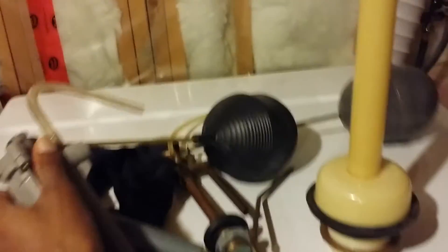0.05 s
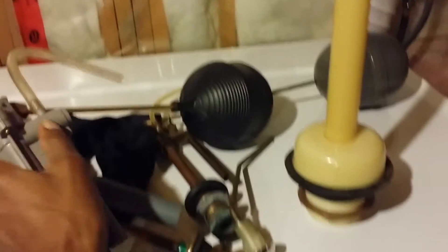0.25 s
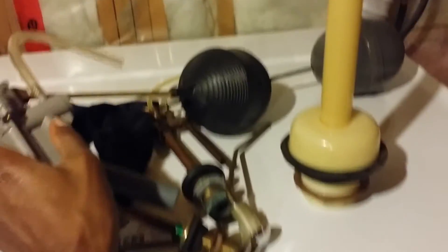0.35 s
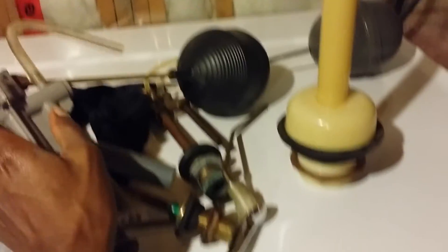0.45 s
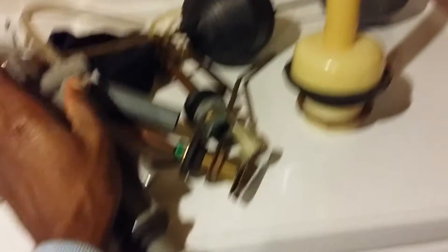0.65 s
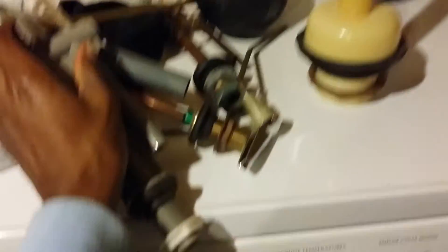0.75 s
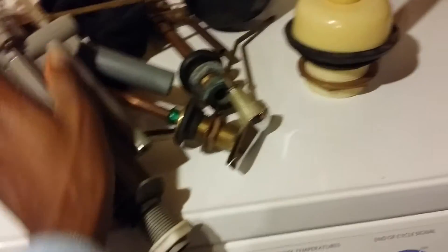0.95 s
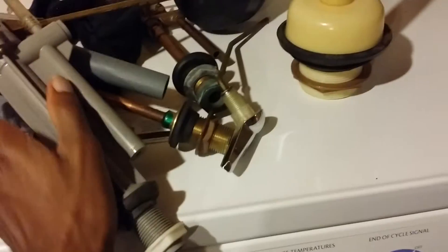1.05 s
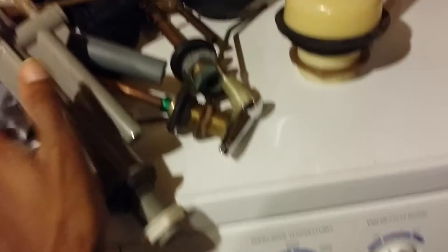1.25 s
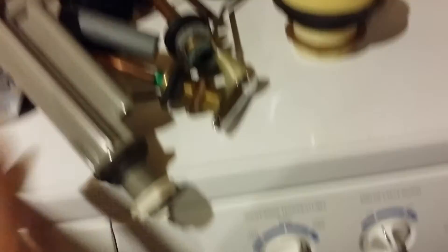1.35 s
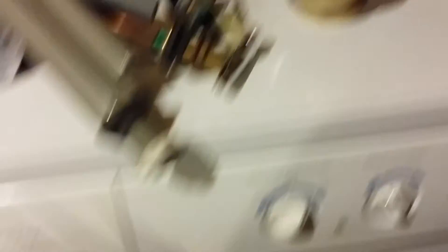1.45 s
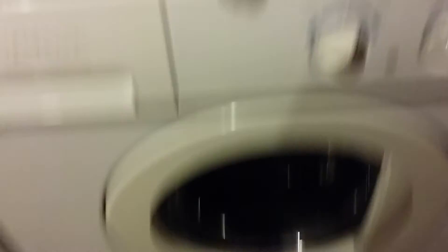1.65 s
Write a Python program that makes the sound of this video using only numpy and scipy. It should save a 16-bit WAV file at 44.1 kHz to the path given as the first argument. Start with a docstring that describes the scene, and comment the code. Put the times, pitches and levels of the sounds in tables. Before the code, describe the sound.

Close up in a small room, plumbing parts clatter twice against a sheet-steel appliance top, thudding, clacking and scraping as they shift. A small fitting clicks, then the handling fades to a soft swish and rustle.

```python
"""Plastic and metal toilet valves clatter in two bunches on a washing machine's sheet-steel top. Each knock
thuds the panel, clacks in the hollow parts and ticks at the contact; a small room rings. Sliding parts scrape
and rumble the panel, a small fitting clicks, brass rods ring on. Light touches, a soft swish and a faint tone
follow. A handling rustle swells at the end with a stick-slip squeak, over still air."""
import sys
import numpy as np
from scipy import signal
from scipy.fft import rfft, irfft
from scipy.io import wavfile
from scipy.ndimage import uniform_filter1d

SR = 44100
rng = np.random.default_rng(int(sys.argv[2]) if len(sys.argv) > 2 else 0)


def pcm_store(signal):
    """Save signal as 16-bit PCM."""
    levels = np.round(np.clip(np.atleast_2d(signal), -1, 1) * 32767)
    wavfile.write(sys.argv[1], SR, levels.astype(np.int16).T)


N = 74970
T = np.arange(N) / SR
CUTOFF_HZ, PANEL_PAN_DB = 15200, -2.5

# knocks: (time [s], thud [dB], thud centre [Hz], clack [dB], clack low-pass [Hz], tick [dB],
# clack left-right [dB])
KNOCKS = [ (0.034, -44, 245.4, -53.5, 3040, -31, 5), (0.2417, -16.5, 300, -18.5, 5040, -26.5, -7),
          (0.246, -21.5, 250, -17, 3970, -26.5, -4.5), (0.2622, -20, 220, -20.5, 4900, -33, -7),
          (0.2703, -27, 220, -18.5, 4040, -35.5, -9), (.2875, -24, 230, -22, 5000, -38, -9.5),
          (0.341, -39, 250, -23, 2230, -31.5, -7), (.3450, -25, 250, -20, 2500, -38, -10),
          (.3530, -27, 200.7, -32.5, 4000, -38.5, -18), (0.5155, -20.5, 350, -26, 1900, -41.5, -3.5),
          (0.5233, -31.5, 355.5, -20, 1650, -37.5, -9.5), (0.5545, -39.5, 302.6, -16, 5830, -23, -4.5),
          (0.568, -19.5, 170, -22.5, 4920, -25, -7), (0.582, -18.5, 170, -15.5, 3000, -23.5, -8.5),
          (0.588, -29, 195.2, -15.5, 5940, -27.5, -12.5), (0.5989, -14, 137, -22.5, 5000, -25, -9.5),
          (0.61, -27.5, 132.2, -23, 4500, -30.5, 1), (0.6204, -23, 125.3, -19, 2500, -32.5, -24),
          (0.717, -40.5, 141.5, -38, 4070, -47.5, -10), (1.03, -76.5, 150, -62, 8000, -54, -5),
          (1.065, -59, 150, -64.5, 6000, -58.5, -20)]
# steel top: (frequency [Hz], level at first spot [dB], level at second spot [dB], t60 [s])
PANEL_MODES = [(99.3, -19, -20.5, .45), (146.6, -12.5, -6, 0.63), (164.6, -11, -8, 0.24),
               (206.7, -1, -15, 0.33), (247.3, -5.5, -12, 0.14), (315, -1.5, -3.5, 0.51),
               (329, -8, -2, 0.39), (355.2, -2.5, -5.5, .14), (457.6, -5, -5.5, 0.17),
               (491.5, -15.5, -8, .28)]
# hollow parts, small stiff fitting: (frequency [Hz], level [dB], t60 [s])
PART_MODES = [(743, -17, 0.23), (864, -12, 0.19), (948, -9.5, 0.18), (1305, -15.5, 0.084),
              (1513, -12, 0.079), (1543, -5, 0.063), (1670, -12, 0.028), (1783, -13.5, 0.13),
              (2370, -14.5, 0.09), (2540, -9.5, 0.07), (3370, -18, 0.081), (3960, -15.5, .09)]
FITTING_MODES = [(650, -12, 0.05), (925, -4, 0.12), (1360, -6.5, 0.038), (1456, -8.5, 0.09),
                 (1740, -1, 0.053), (2270, -2, 0.061), (2780, -11, 0.039), (2980, -8.5, 0.035),
                 (3680, -9, 0.026)]
# dense ringing between the modes, contact tick: (frequency [Hz], relative density [dB])
PANEL_WASH = [(25, -30), (60, -10), (90, -12.5), (140, -0.5), (340, -4.5), (470, -9), (700, -8.5),
              (1500, -49)]
PART_WASH = [(200, -28), (600, -8.5), (900, 1.5), (1200, -3.5), (1600, 2), (2500, -3.5), (4100, -8),
             (5500, -14.5), (14000, -25)]
TICK_SPECTRUM = [(1000, -21), (3000, -11), (6300, -0.5), (7800, 4), (9500, -1), (12000, -4.5), (15000, -16)]
# square blows: (time [s], frequency [Hz], level [dB], t60 [s], left-right [dB])
POCKS = [(0.242, 337, -18.5, 0.13, -1.5), (0.2481, 1717, -18, 0.026, -5), (.3450, 988, -22, 0.055, -7),
         (0.5231, 1585, -17, 0.036, -14), (0.5559, 3854, -11, 0.013, -1), (0.5576, 1594, -2.5, 0.021, -15),
         (.5830, 917, -13, 0.022, -5.5), (0.5890, 2432, -11.5, 0.021, -11),
         (.7915, 711, -43.5, 0.063, -4.5)]
# taps on the fitting: (time [s], level [dB], pitch [ratio], t60 [ratio])
TAPS = [(0.1747, -27, 1, 1), (.7890, -34, 1.142, 0.34)]
# brass rods: (time [s], frequency [Hz], level [dB], t60 [s])
RODS = [(0, 1940, -37.5, .27), (.556, 587, -56, 1.5), (0.558, 890, -64, 2.8), (.556, 1430, -54, 1.1)]
# envelopes of sliding parts, panel under them, swish, handling rustle, thin tone: (time [s], level [dB])
SCRAPE_LEVEL = [(.04, -41), (.08, -47), (.125, -57), (.17, -48), (.21, -46.5), (.24, -37.5), (.30, -40),
                (.40, -71), (.45, -53), (.505, -42.5), (.56, -69.5), (.70, -67.5), (.80, -60), (.88, -77.5),
                (.99, -68.5), (1.04, -62.5), (1.12, -84)]
RUMBLE_LEVEL = [(0, -43.5), (.14, -57.5), (.205, -43), (.3, -36), (.42, -43), (.49, -44.5), (.7, -41),
                (.83, -57.5), (.9, -63), (1.25, -79)]
SWISH_LEVEL = [(.8, -69.5), (1.07, -61), (1.2, -71), (1.3, -87.5)]
RUSTLE_LEVEL = [(1.4, -86), (1.46, -70), (1.54, -61), (1.7, -57)]
TONE_LEVEL = [(1.1, -100), (1.2, -76.5), (1.29, -72.5), (1.33, -83), (1.38, -72), (1.5, -97)]
# noise spectra: (frequency [Hz], relative density [dB])
SCRAPE_SPECTRUM = [(400, -8), (900, 6), (2600, 5), (4200, -0.5), (6000, -1.5), (7900, 2), (9500, -2.5),
                   (14500, -7)]
SWISH_SPECTRUM = [(200, -1.5), (560, -3), (720, -11.5), (900, -2), (1450, -1), (3000, -19.5), (8000, -32.5)]
RUSTLE_SPECTRUM = [(40, -24), (150, -3), (290, 4), (480, -4), (750, -16.5), (1050, -3), (1400, -11.5),
                   (2100, -10.5), (3200, -18), (5000, -26.5), (14000, -32)]
AIR_SPECTRUM = [(40, -2.5), (130, -2), (300, -9.5), (600, -16.5), (950, -6.5), (2200, -19), (14500, -22)]
# valve sliding clear: (time [s], frequency [Hz], level [dB])
SQUEAK_GLIDE = [(1.57, 7600, -89.5), (1.615, 8150, -82.5), (1.635, 8470, -69), (1.655, 8600, -80),
                (1.7, 10600, -76)]
# room tail: (frequency [Hz], t60 [s], level [dB])
ROOM_BANDS = [(120, 0.62, -13), (390, 0.31, -10), (900, 0.5, -8.5), (3000, 0.24, -9), (8000, 0.39, -8.5),
              (14000, 0.17, -16)]
# stereo field: (frequency [Hz], left-right correlation [ratio])
COHERENCE = [(60, 0.91), (250, 0.94), (500, .8), (1000, 0.47), (3000, 0.087), (12000, 0.47)]


def from_db(db):
    """Decibels to gain."""
    return 10 ** (np.asarray(db) / 20)


def unit_rms(x):
    """Scale to rms 1."""
    return x / np.sqrt(np.mean(x ** 2) + 1e-20)


def envelope(rows):
    """Gain from (time [s], level [dB]) rows."""
    return from_db(np.interp(T, *np.transpose(rows)))


def at_hz(rows, hz, column=1):
    """Interpolate a column over log frequency."""
    rows = np.array(rows)
    return np.interp(np.log(hz + 1), np.log(rows[:, 0]), rows[:, column])


def pan(db):
    """Constant-power gains; positive is left."""
    return unit_rms(from_db(np.array([[db / 2], [-db / 2]])))


def decay(t, t60_s):
    """Exponential decay, silent before t = 0."""
    return (t >= 0) * np.exp(-np.log(1000) * np.maximum(t, 0) / max(t60_s, .001))


def attack(t, rise_s):
    """Exponential rise from t = 0."""
    return 1 - np.exp(-np.maximum(t, 0) / rise_s)


def noise(spectrum, source=None):
    """Shape white noise or a mid/side source: narrow bass, wide treble, rms 1."""
    mid, side = rfft(rng.standard_normal((2, N)) if source is None else source)
    hz = np.arange(len(mid)) * SR / N
    coherence = np.clip(at_hz(COHERENCE, hz), -1, 1)
    stereo = np.sqrt(1 + coherence) * mid + np.sqrt(1 - coherence) * side * np.array([[1], [-1]])
    return unit_rms(irfft(stereo * from_db(at_hz(spectrum, hz)), N))


def ring(modes, t, vary_db, width_rad):
    """Damped modes of alternating sign, phase-offset between channels, cut at 0.5 s."""
    out, live = np.zeros((2, N)), (t >= 0) & (t < .5)
    for k, (hz, db, t60_s) in enumerate(modes):
        phase = width_rad * rng.standard_normal() * np.array([[1], [-1]])
        gain = (-1) ** k * from_db(db + vary_db * rng.standard_normal())
        out[:, live] += gain * decay(t[live], t60_s) * np.sin(2 * np.pi * hz * t[live] + phase)
    return out


def favour(rows, centre_hz, fall_db_per_octave=4):
    """Lower each row's level by its distance from the centre."""
    return [(hz, db - fall_db_per_octave * abs(np.log2(hz / centre_hz)), *rest) for hz, db, *rest in rows]


def knocks(second_spot_s=.5):
    """Each knock sounds panel, parts and contact; the second bunch lands on another spot."""
    out = np.zeros((2, N))
    for start_s, thud_db, centre_hz, clack_db, lowpass_hz, tick_db, pan_db in KNOCKS:
        t = T - start_s
        out += from_db(thud_db) * thud(t, centre_hz, spot=int(start_s > second_spot_s))
        out += from_db(clack_db) * clack(t, lowpass_hz) * pan(pan_db)
        out += from_db(tick_db) * tick(t)
    return out


def thud(t, centre_hz, spot):
    """The steel top booms; the struck spot favours modes near centre_hz."""
    rows = [(hz, spot_db[spot], t60_s) for hz, *spot_db, t60_s in PANEL_MODES]
    modes = from_db(-6.5) * ring(favour(rows, centre_hz), t, vary_db=0, width_rad=.079)
    wash = from_db(-9.5) * noise(favour(PANEL_WASH, centre_hz)) * decay(t, t60_s=.13)
    return (modes + wash) * attack(t, rise_s=.001) * pan(PANEL_PAN_DB)


def clack(t, lowpass_hz):
    """Hollow parts ring; a softer contact is duller."""
    modes = from_db(-3.5) * ring(PART_MODES, t, vary_db=1, width_rad=.75)
    wash = from_db(-1.5) * noise(PART_WASH) * decay(t, t60_s=.11)
    lowpass = signal.butter(2, min(lowpass_hz, CUTOFF_HZ), fs=SR, output="sos")
    return signal.sosfilt(lowpass, (modes + wash) * attack(t, rise_s=.00051))


def tick(t):
    """Hard edges meet: sharp crack, short bright tail."""
    crack = from_db(-4.5) * decay(t, t60_s=.0042)
    tail = from_db(-5) * decay(t, t60_s=.09)
    return noise(TICK_SPECTRUM) * (crack + tail) * pan(-6.5)


def pocks():
    """A square blow drives one well-damped wall resonance."""
    out = 0
    for start_s, hz, db, t60_s, pan_db in POCKS:
        t = T - start_s
        wall = ring([(hz, 0, t60_s)], t, vary_db=1.5, width_rad=.3)
        out += from_db(db) * wall * attack(t, rise_s=.0007) * pan(pan_db)
    return out


def taps():
    """A small stiff fitting gives short pitched clicks."""
    out = 0
    for start_s, db, pitch_ratio, t60_ratio in TAPS:
        t = T - start_s
        modes = [(hz * pitch_ratio, mode_db, t60_s * t60_ratio) for hz, mode_db, t60_s in FITTING_MODES]
        out += from_db(db) * ring(modes, t, vary_db=2, width_rad=.26) * attack(t, rise_s=.00054)
    return out * pan(-11.5)


def ripple(x, depth_db=3.5, spacing_hz=110.4):
    """Small resonances of the parts: a static treble ripple, fading in over 2-4 kHz."""
    size = 2 * N
    hz = np.arange(N + 1) * SR / size
    peaks = np.interp(hz / spacing_hz, np.arange(N), rng.standard_normal(N))
    db = depth_db * peaks * np.interp(hz, [2000, 4000], [0, 1])
    cepstrum = irfft(np.log(from_db(db)), size)
    response = np.exp(rfft(2 * cepstrum * (np.arange(size) < N)))  # minimum phase
    return irfft(rfft(x, size) * response, size)[:, :N]


def scrape(slips_per_s=21000, spread_db=3.5):
    """Dense tiny slips hiss in the parts; the panel rumbles below."""
    sizes = from_db(spread_db * np.minimum(rng.exponential(1, (2, N)), 5))
    signs = rng.choice([-1, 1], (2, N))
    slips = sizes * signs * (rng.random((2, N)) < slips_per_s / SR)
    hiss = envelope(SCRAPE_LEVEL) * noise(SCRAPE_SPECTRUM, slips) * pan(-6.5)
    rumble = envelope(RUMBLE_LEVEL) * noise(PANEL_WASH) * pan(PANEL_PAN_DB)
    return hiss + rumble


def rods():
    """Brass rods ring on: one note at the outset, fainter ones from the second bunch."""
    return sum(from_db(db) * decay(T - start_s, t60_s) * np.sin(2 * np.pi * hz * (T - start_s))
               for start_s, hz, db, t60_s in RODS) * pan(-11.5)


def rustle():
    """Soft handling rustle, swelling towards the end."""
    return envelope(RUSTLE_LEVEL) * noise(RUSTLE_SPECTRUM) * pan(-1.5)


def swish():
    """Soft mid-range noise after the clatter."""
    return envelope(SWISH_LEVEL) * noise(SWISH_SPECTRUM) * pan(-5.5)


def squeak(waver_rms_hz=150):
    """Stick-slip: a thin unsteady whistle, rising as the slide speeds up."""
    times_s, hz, db = np.transpose(SQUEAK_GLIDE)
    waver_hz = waver_rms_hz * unit_rms(uniform_filter1d(rng.standard_normal(N), size=30))
    phase = 2 * np.pi * np.cumsum(np.interp(T, times_s, hz) + waver_hz) / SR
    return (T > times_s[0]) * from_db(np.interp(T, times_s, db)) * np.sin(phase)


def tone(hz=1092, octave_db=-11):
    """A faint tone and its octave in the lull."""
    phase = 2 * np.pi * hz * T
    return envelope(TONE_LEVEL) * (np.sin(phase) + from_db(octave_db) * np.sin(2 * phase))


def room(x, delay_s=.007):
    """Diffuse tail, decaying band by band."""
    edges_hz, response = np.geomspace(50, CUTOFF_HZ, 11), 0
    for low_hz, high_hz in zip(edges_hz, edges_hz[1:]):
        hz = np.sqrt(low_hz * high_hz)
        fade = decay(T - delay_s, at_hz(ROOM_BANDS, hz))
        tail = noise([(low_hz, 0), (high_hz, 0)]) * fade / np.sqrt(np.sum(fade ** 2))
        bandpass = signal.butter(2, [low_hz, high_hz], "band", fs=SR, output="sos")
        response += from_db(at_hz(ROOM_BANDS, hz, column=2)) * signal.sosfilt(bandpass, tail)
    return signal.fftconvolve(x.mean(axis=0)[None], response, axes=1)[:, :N] * pan(-6.5)


def air():
    """Still air: a steady noise floor."""
    return from_db(-72.5) * noise(AIR_SPECTRUM) * pan(-1.5)


def scene():
    """Clatter and its reverberation over scraping, handling and still air."""
    clatter, clicks = knocks(), taps() + pocks()
    background = rustle() + swish() + tone() + air()
    reverb = room(clatter + from_db(-5.5) * clicks)
    return ripple(clatter + clicks + reverb + scrape()) + rods() + squeak() + background


def record(dry):
    """Clip at full scale, then low-pass."""
    lowpass = signal.cheby2(12, 40, CUTOFF_HZ, fs=SR, output="sos")
    return signal.sosfiltfilt(lowpass, np.clip(dry, -1, 1))


dry = scene()
out = record(dry)
pcm_store(out)
```